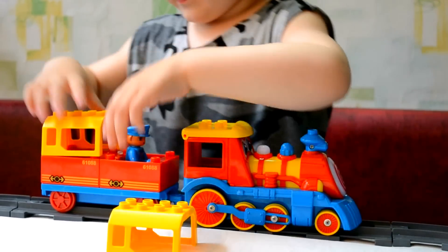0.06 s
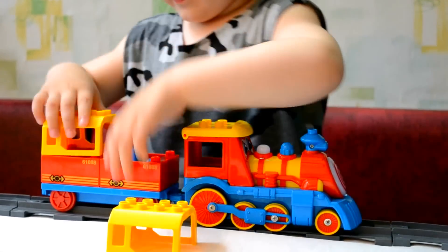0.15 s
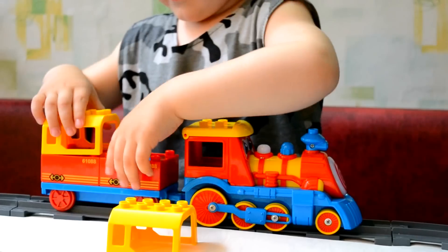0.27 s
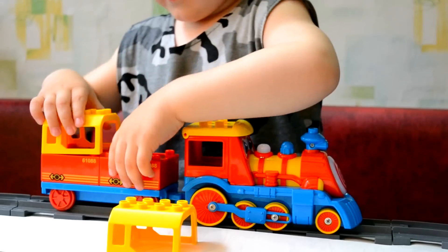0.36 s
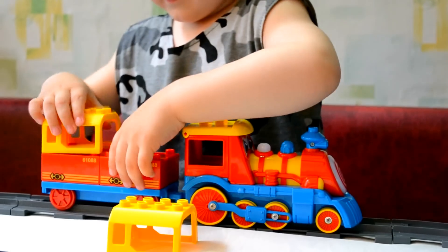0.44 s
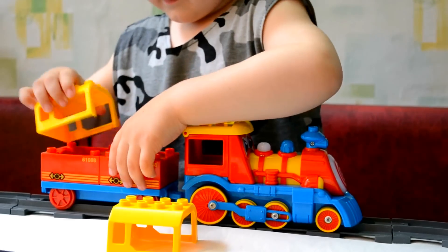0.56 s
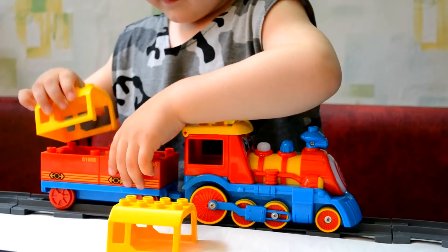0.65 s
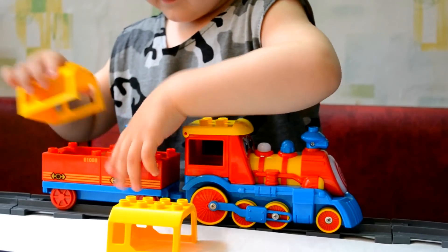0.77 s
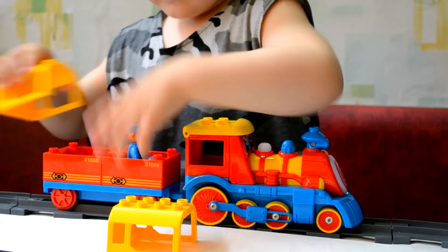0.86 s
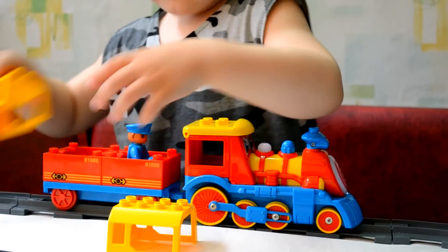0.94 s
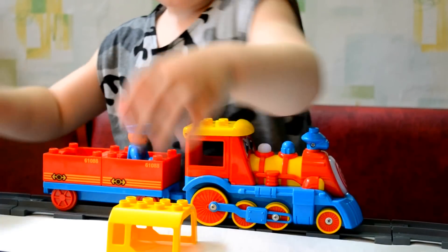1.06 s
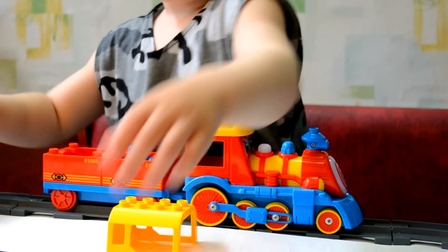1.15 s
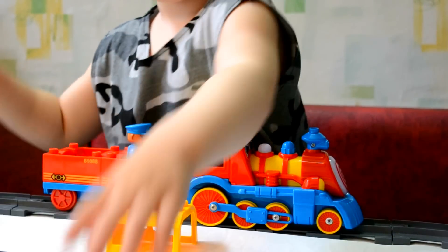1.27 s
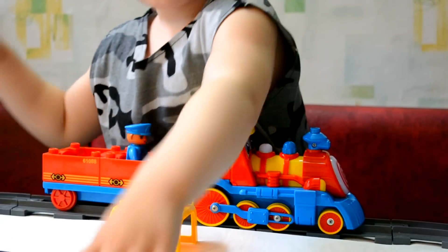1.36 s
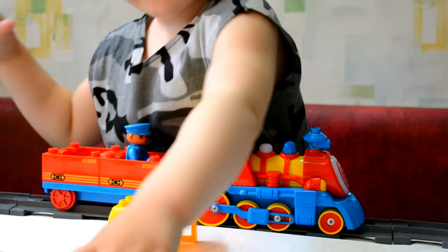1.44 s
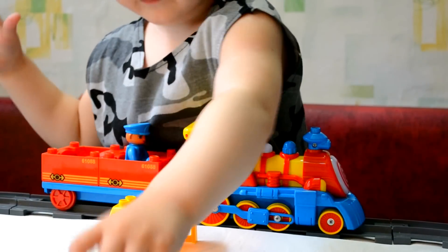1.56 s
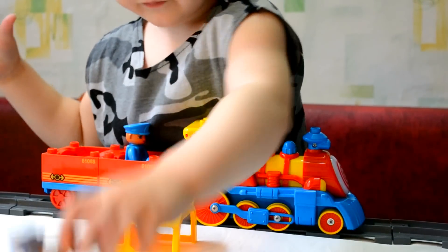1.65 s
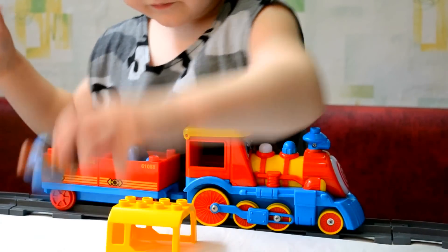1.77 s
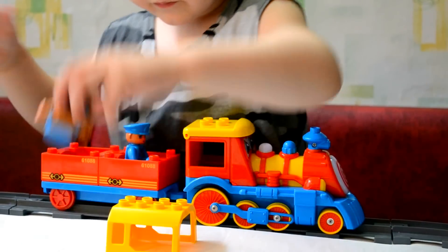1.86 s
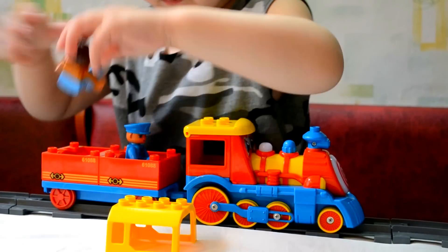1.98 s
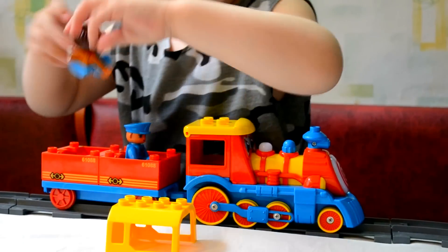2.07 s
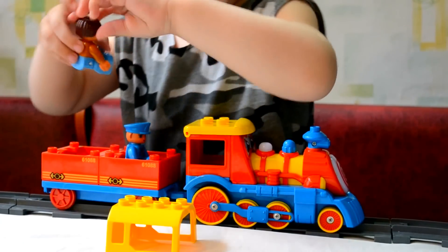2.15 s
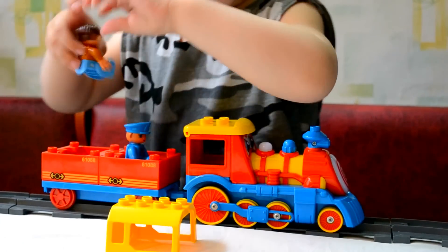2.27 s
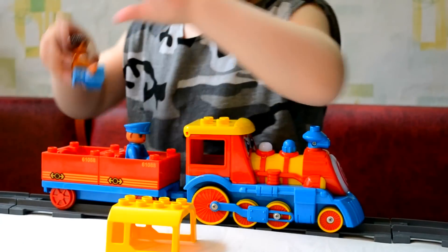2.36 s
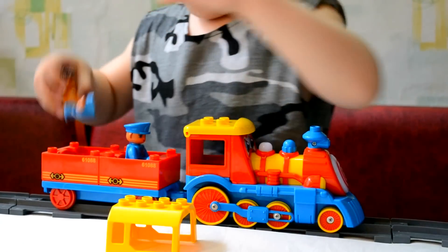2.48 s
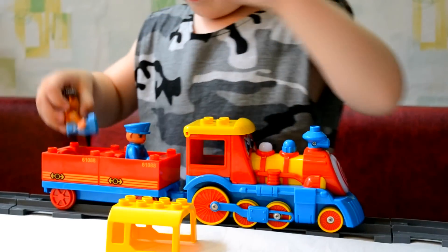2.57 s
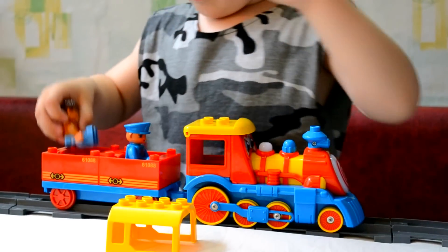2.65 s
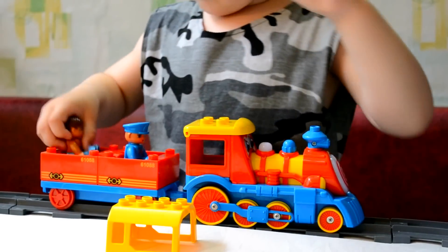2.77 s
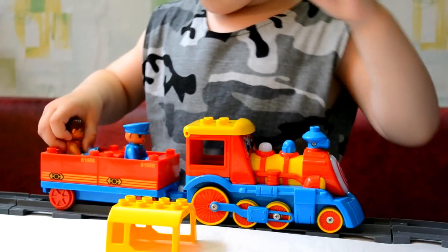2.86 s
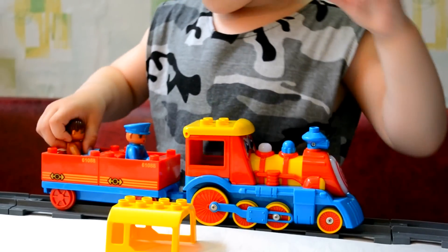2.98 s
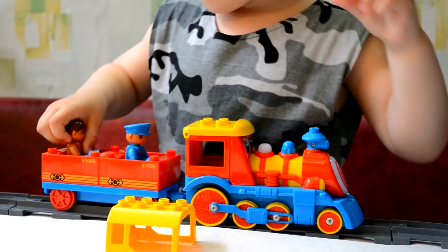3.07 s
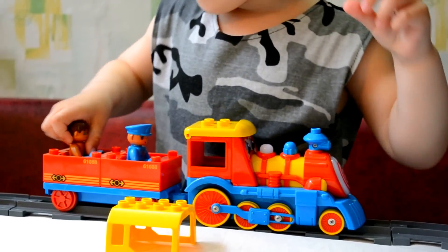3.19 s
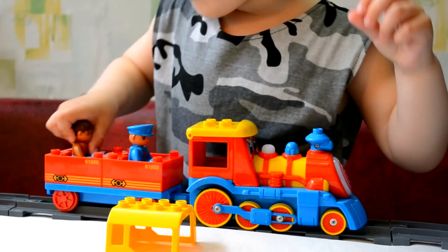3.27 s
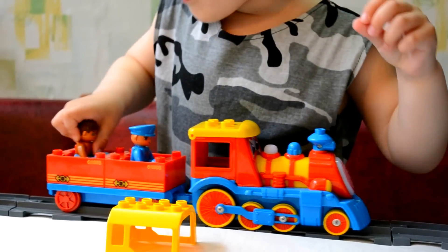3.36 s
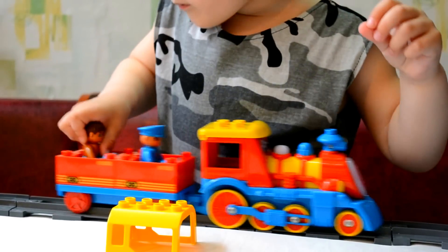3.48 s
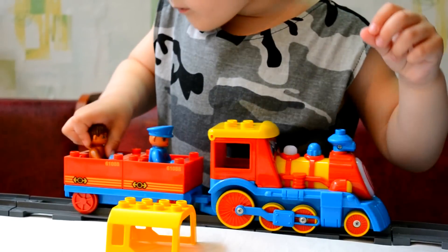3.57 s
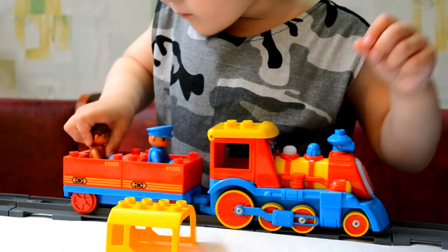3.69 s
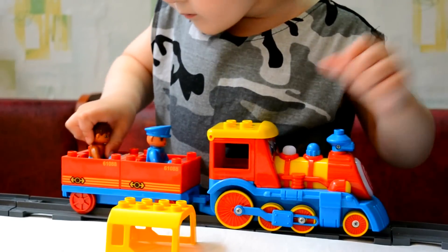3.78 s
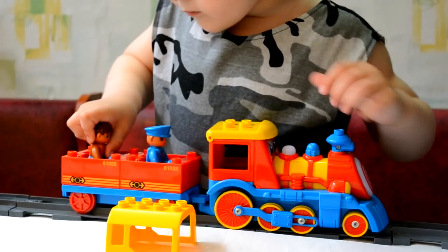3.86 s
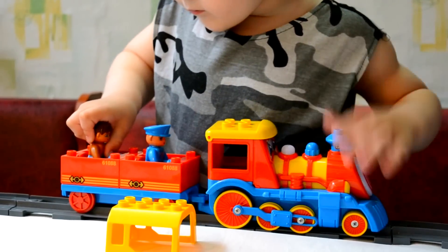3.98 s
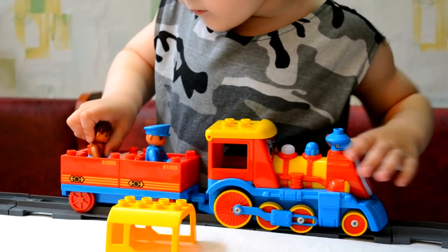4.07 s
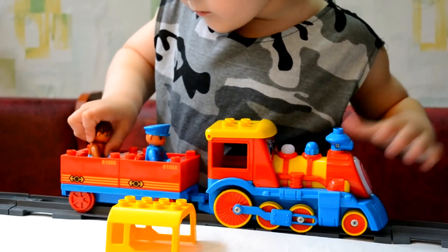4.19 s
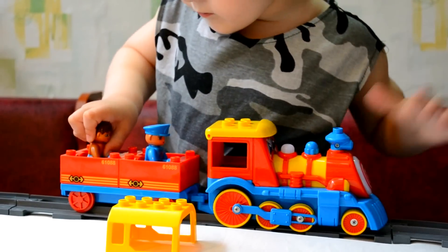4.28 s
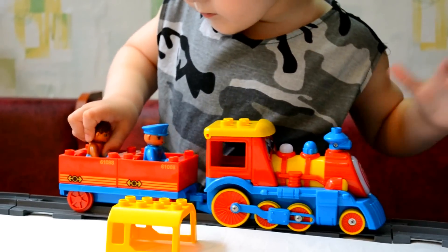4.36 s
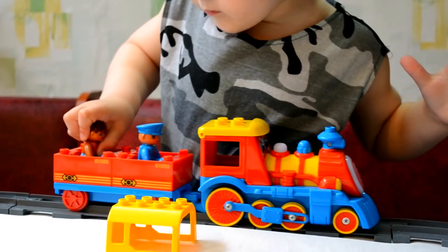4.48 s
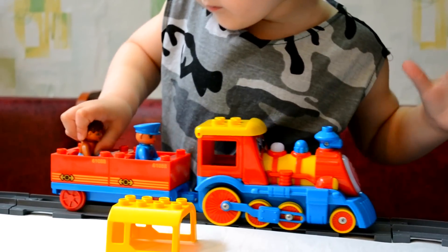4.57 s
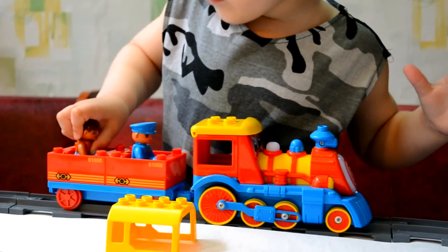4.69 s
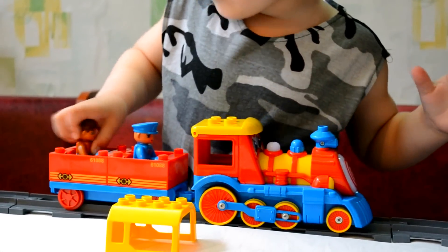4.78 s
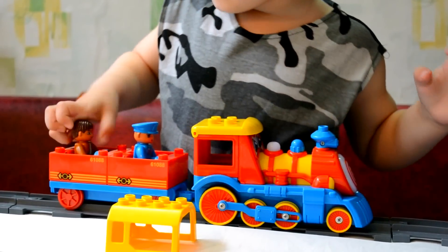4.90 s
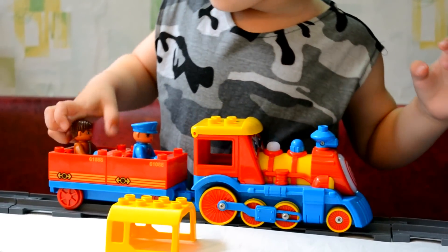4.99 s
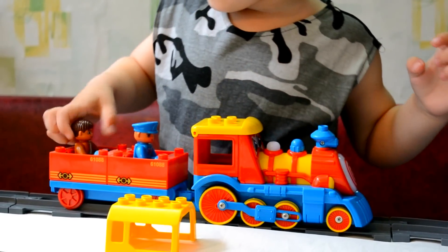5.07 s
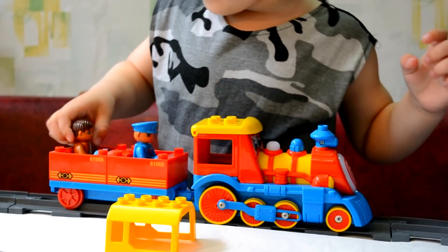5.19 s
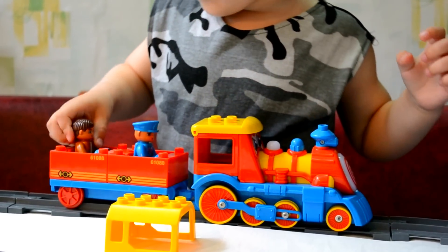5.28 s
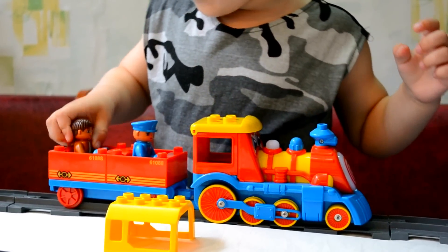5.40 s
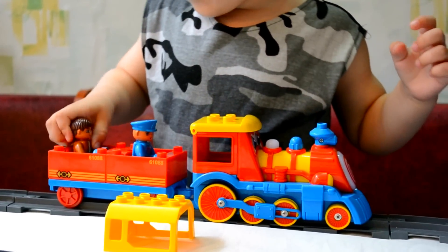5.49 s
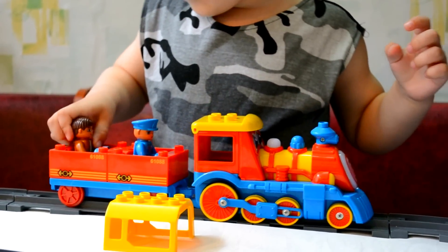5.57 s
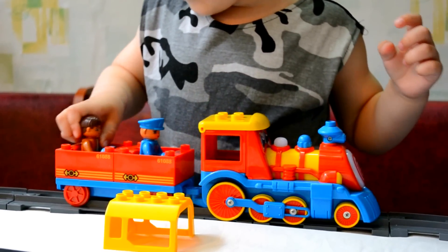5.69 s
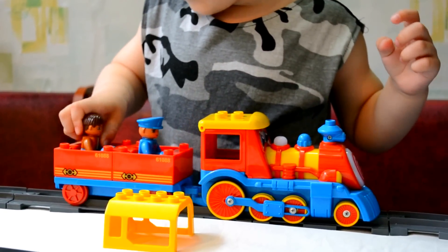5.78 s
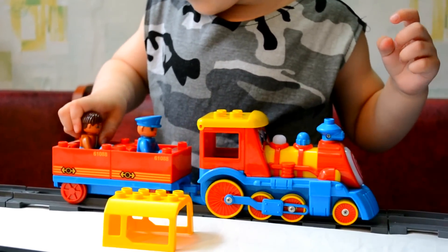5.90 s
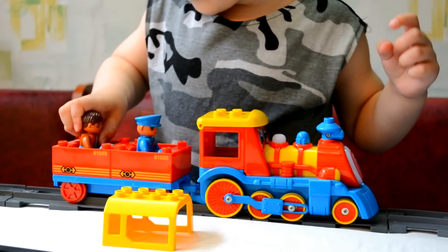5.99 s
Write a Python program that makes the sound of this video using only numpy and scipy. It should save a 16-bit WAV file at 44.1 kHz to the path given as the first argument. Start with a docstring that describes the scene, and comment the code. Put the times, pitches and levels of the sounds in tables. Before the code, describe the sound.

Close-miked toy handling indoors: a few crisp clicks on a hollow plastic wagon, then the loudest event, a bright clattering landing of a hollow plastic part on the table. Quiet finger scuffs and small knocks continue with gaps between them. Late on, tight plastic creaks and snaps sharply onto studs, followed by a short rub and faint taps. Soft room noise, a slight electrical hum and barely audible low throbs lie underneath.

```python
"""Large plastic bricks tap on a hollow toy wagon: each contact is a noise crack plus decaying shell modes.
A loose hollow cab lands hard on the table with its own modes; a figure pressed on the studs snaps dryly.
Stick-slip noise makes the rubs and scuffs. Underneath lie soft sinking throbs, mains hum and room air.
Contacts and friction carry the diffuse decay of a small room; a low-pass ends the band near 11 kHz."""
import sys
import numpy as np
from scipy import signal
from scipy.fft import rfft, irfft, next_fast_len
from scipy.io import wavfile
from scipy.ndimage import map_coordinates

SR = 44100
rng = np.random.default_rng(int(sys.argv[2]) if len(sys.argv) > 2 else 0)


def to_wav(s):
    """Save 16-bit WAV."""
    ch = np.atleast_2d(s).T  # columns
    pcm = np.round(np.clip(ch, -1, 1) * 32767)  # PCM
    wavfile.write(sys.argv[1], SR, pcm.astype(np.int16))


N = 266364  # length in samples


def amp(db):
    """Logarithmic level: decibels become an amplitude ratio."""
    return 10 ** (np.asarray(db) / 20)


def unit(x):
    """Normalisation: scale to rms 1."""
    return x / np.sqrt(np.mean(x ** 2) + 1e-20)


def along(points, hz):
    """Interpolation on a logarithmic frequency axis through (Hz, value) points."""
    f, v = np.transpose(points)
    return np.interp(np.log(hz + 1), np.log(f + 1), v)


def add(track, s, sound):
    """Superposition: mix a sound into the track from time s on."""
    part = track[max(round(s * SR), 0):][:len(sound)]
    part += sound[:len(part)]


def coloured(x, curve):
    """Minimum-phase filtering: the folded cepstrum gives a causal filter of gain curve(Hz) dB."""
    m = 2 * next_fast_len(len(x) // 2 + 1024)
    gain = amp(curve(np.fft.rfftfreq(m, 1 / SR)))
    cepstrum = irfft(np.log(gain + 1e-6))
    cepstrum[1:m // 2] *= 2
    cepstrum[m // 2 + 1:] = 0
    response = np.exp(rfft(cepstrum))
    return irfft(rfft(x, m) * response)[:len(x)]


# Reverberation of the room: pitch_hz [Hz], t60_s [s]
ROOM_DECAY = [(150, 0.2), (800, 0.27), (2200, 0.24), (5500, 0.23), (11000, 0.18)]


def in_room(x, wet_db, build_s=0.0012):
    """Diffuse reverberation: table and walls answer with noise, new each time, that decays band by band."""
    hz = np.fft.rfftfreq(256, 1 / SR)
    t = np.arange(80) * 128 / SR
    noise = rng.standard_normal((len(hz), len(t), 2)) @ [1, 1j]
    decay = amp(-60 * t / along(ROOM_DECAY, hz)[:, None])
    tail = signal.istft(noise * decay)[1]
    tail *= 1 - np.exp(-(np.arange(len(tail)) / SR / build_s) ** 2)
    response = amp(wet_db) * unit(tail) / np.sqrt(len(tail))
    response[0] = 1  # direct sound
    return signal.fftconvolve(x, response)


# Spectrum of the room air: pitch_hz [Hz], density_db [dB per Hz, relative]
AIR_COLOUR = [(12, -63), (20, -23), (185, -8), (341, -6.5), (445, -3), (494, -4), (628, -3), (698, -7),
              (756, -3.5), (1960, -9.5), (2490, -12), (3610, -13), (8000, -29.5), (9130, -24.5),
              (11300, -42.5), (14700, -59), (22000, -120)]
# Mains hum components: pitch_hz [Hz], level_db [dB, before drift]
HUM_TONES = [(100, -92), (399, -75), (500, -66.5), (699.5, -66)]


def background(air_db=-58.0, air_drift_db=2.0, hum_drift_db=2.2, phase_drift_rad=0.5):
    """Stationary noise and tones: room air and an appliance's mains hum, drifting slowly in level."""
    t = np.arange(N) / SR
    drift = lambda: map_coordinates(rng.standard_normal(64), [t * 5])  # five random values per second
    air = unit(coloured(rng.standard_normal(N), lambda f: along(AIR_COLOUR, f)))
    air = amp(air_db + air_drift_db * drift()) * air
    hum = np.zeros(N)
    for hz, db in HUM_TONES:
        level = amp(db + hum_drift_db * drift())
        hum += level * np.sin(2 * np.pi * hz * t + phase_drift_rad * drift())
    return air + hum


# Faint low throbs: start_s [s], level_db [dB, envelope peak]
THROB_TIMES = [(1.019, -60), (2.46, -62), (3.91, -70), (5.379, -61.5)]


def throbs(start_hz=108, sink_per_s=4, swell_s=0.021):
    """Frequency glide: a soft low tone swells and fades while its pitch sinks exponentially."""
    out = np.zeros(N)
    t = np.arange(SR // 4) / SR
    phase = 2 * np.pi * np.cumsum(start_hz * np.exp(-sink_per_s * t)) / SR
    swell = t / swell_s * np.exp(1 - t / swell_s)
    for s, db in THROB_TIMES:
        add(out, s, amp(db) * swell * np.sin(phase))
    return out


def friction(slips_per_s, size_db, hiss):
    """Stick-slip friction: a third of a second of tiny random ticks over a fine hiss."""
    n = SR // 3
    ticks = (rng.random(n) < slips_per_s / SR) * amp(size_db * rng.standard_normal(n))
    return (ticks + hiss) * rng.standard_normal(n)


# Brief drags of fingers and parts: start_s [s], length_s [s], pitch_hz [Hz], level_db [dB]
SCUFF_DRAGS = [(0.56, 0.11, 900, -52), (0.761, 0.016, 1600, -45.5), (1.104, 0.038, 2350, -50),
               (1.281, 0.021, 377, -50.5), (1.497, 0.037, 410, -58.5), (1.637, 0.04, 360, -55.5),
               (1.947, 0.1, 1050, -49), (2.23, 0.044, 9400, -65), (2.401, 0.039, 350, -60),
               (2.704, 0.045, 750, -50), (2.802, 0.039, 2680, -47), (2.998, 0.04, 1410, -52),
               (3.544, 0.064, 176, -58.5), (4.465, 0.031, 1160, -52), (4.517, 0.057, 1090, -55),
               (5.906, 0.022, 2640, -49.5)]
SCUFF_OCTAVES, SCUFF_NARROWING = 0.5, 0.37  # width at 1 kHz [octave-like]; power by which it shrinks with pitch


def scuffs():
    """Resonant filtering of friction: short drags swell and fade in one resonance of the hollow plastic."""
    out = np.zeros(N)
    for s, length, hz, db in SCUFF_DRAGS:
        force = friction(slips_per_s=1000, size_db=5.5, hiss=0.095)
        width = SCUFF_OCTAVES * (hz / 1000) ** -SCUFF_NARROWING
        resonance = lambda f: -20 * np.log10(1 + (np.sinh(np.log((f + 1) / hz)) * 2 / width) ** 2)
        n = round(length * SR)
        drag = coloured(force, resonance)[-n:] * signal.windows.tukey(n, .6)
        add(out, s, in_room(amp(db) * unit(drag), wet_db=-8.0))
    return out


STROKE_DEPTH_DB = 20.5  # a stroke starts and ends this far under its peak


def pressure(s, rise, fall, db):
    """Friction follows load: the hand presses to a peak and lets go, as (s, level dB) corners."""
    return [(s - rise, db - STROKE_DEPTH_DB), (s, db), (s + fall, db - STROKE_DEPTH_DB)]


def stroke(levels, colour, force):
    """Source and filter: friction takes a part's colour and follows the hand's pressure."""
    s, db = np.transpose(levels)
    t = np.arange(len(force)) / SR + s[0]
    envelope = amp(np.interp(t, s, db, right=-120))
    return unit(coloured(force, lambda f: along(colour, f))) * envelope


# Plastic sliding on plastic: peak_s [s, greatest pressure], rise_s [s], fall_s [s], level_db [dB]
RUB_STROKES = [(0.205, 0.032, 0.022, -54), (0.53, 0.006, 0.15, -54), (1.44, 0.056, 0.11, -46.5),
               (3.52, 0.24, 0.092, -60), (3.572, 0.035, 0.023, -43), (5.746, 0.0038, 0.096, -37)]
# Spectrum of the sliding: pitch_hz [Hz], density_db [dB per Hz, relative]
SLIDE_COLOUR = [(120, -28), (200, -11), (839, -8.5), (945, -7.5), (1200, -22), (1370, -3.5), (3710, -1.5),
                (4390, -3), (5110, -10), (10200, -19), (11300, -44), (14700, -44), (22000, -120)]
# Two pushes of the figure onto the studs, before and after the hard snap:
# start_s [s], level_db [dB, before the grind gain]
STUD_PUSHES = [
    [(5.546, -50), (5.554, -37), (5.564, -38), (5.569, -48)],
    [(5.612, -49), (5.646, -40), (5.658, -51), (5.666, -38.5), (5.684, -41), (5.694, -37.5), (5.738, -54)],
]


def rubbing(grind_db=-3):
    """Sliding friction: bricks slide over the wagon, and the figure grinds on its studs."""
    out = np.zeros(N)
    for rub in RUB_STROKES:
        levels = pressure(*rub)
        slide = stroke(levels, SLIDE_COLOUR, friction(slips_per_s=1200, size_db=2.5, hiss=0.14))
        add(out, levels[0][0], in_room(slide, wet_db=-7.5))
    for push in STUD_PUSHES:
        grind = stroke(push, STUD_SHELL, friction(slips_per_s=1600, size_db=3.0, hiss=0.16))
        add(out, push[0][0], in_room(amp(grind_db) * grind, wet_db=-14))
    return out


def strike(db, knock_db, bright_db, modes, crack_colour, crack_t60, ring_db, spot=lambda f: 0,
           knock_hz=950, bright_hz=4800, small_hz=140, scatter_db=0.8, impact_db=-14, grip=0.0049):
    """Modal impact: a short noise crack and the part's decaying modes, struck at new strengths."""
    hz, level, t60 = np.transpose(modes)[:, :, None]
    t = np.arange(round((t60.max() + crack_t60) * SR)) / SR
    attack = slice(SR // 125)  # loudness is the rms of the first 8 ms
    loudness = lambda x: np.sqrt(np.mean(x[attack] ** 2))

    strength = amp(level + scatter_db * rng.standard_normal(hz.shape)) * rng.choice([-1, 1], hz.shape)
    detune = 1 + grip * rng.standard_normal(hz.shape)  # the grip shifts the modes a little
    partials = strength * amp(-60 * t / t60) * np.sin(2 * np.pi * hz * detune * t)
    ring = np.sum(partials, axis=0)

    shell_decay = amp(-60 * t / crack_t60)
    impact_decay = amp(impact_db - 60 * t / 0.00626)
    burst = np.resize(rng.standard_normal(SR // 8), len(t)) * (shell_decay + impact_decay)
    crack = coloured(burst, lambda f: along(crack_colour, f))

    # a flat blow knocks low, an edge clicks bright
    knock = lambda f: knock_db / (1 + (f / knock_hz) ** 4)
    bright = lambda f: bright_db * (1 - 1 / (1 + (f / bright_hz) ** 4))
    radiation = lambda f: -10 * np.log10(1 + (small_hz / (f + 10)) ** 4)  # small parts radiate no deep bass
    hit = crack / loudness(crack) + amp(ring_db) * ring / loudness(ring)
    hit = np.pad(hit, (0, SR // 50))
    hit = coloured(hit, lambda f: knock(f) + bright(f) + radiation(f) + spot(f))
    return amp(db) * hit / loudness(hit)


SLIP_GAP_S, SLIP_DB = 0.014, -3  # mean spacing; level against the push table


def slips():
    """Stick-slip release: small unevenly timed slips, stronger with the push, as (s, level dB)."""
    rows = []
    for push in STUD_PUSHES:
        s, db = np.transpose(push)
        times = np.arange(s[0], s[-1] - SLIP_GAP_S / 2, SLIP_GAP_S)
        times = times + SLIP_GAP_S * rng.random(len(times))
        rows += zip(times, np.interp(times, s, db) + SLIP_DB)
    return rows


# Tight plastic slipping and snapping: start_s [s], level_db [dB]
STUD_SNAPS = [(5.5259, -39.5), (5.5526, -42), (5.5637, -42), (5.579, -21), (5.6357, -39.5), (5.6652, -38),
              (5.7442, -39)]
# Ringing modes of the studs: pitch_hz [Hz], level_db [dB, relative], t60_s [s]
STUD_RING = [(1890, -8.5, 0.026), (2330, -29, 0.0091), (2575, -3.5, 0.018), (2750, -5, 0.021),
             (3330, -2, 0.0093), (5730, -10, 0.0054), (9900, -23.5, 0.0074)]
# Crack of the studs' many short-lived modes: pitch_hz [Hz], density_db [dB per Hz, relative]
STUD_SHELL = [(30, -47), (100, -19), (250, -7), (1200, -6), (2600, 1), (4000, -2.5), (6000, -17),
              (8300, -25), (10000, -29), (11500, -39)]
KNOCK_EVEN_DB, KNOCK_SLOPE = -33, 1.3  # softer snaps knock more, harder ones less [dB per dB]


def studs(bright_db=-2, most_knock_db=13):
    """Heavily damped modes: tightly held plastic slips in dry snaps, the soft ones duller."""
    out = np.zeros(N)
    for s, db in STUD_SNAPS + slips():
        knock_db = min(KNOCK_SLOPE * (KNOCK_EVEN_DB - db), most_knock_db)
        snap = strike(db, knock_db, bright_db, STUD_RING, STUD_SHELL, crack_t60=0.0078, ring_db=9.5)
        add(out, s, in_room(snap, wet_db=-21))
    return out


# The cab lands on one edge, then flat: start_s [s], level_db [dB], knock_db [dB], bright_db [dB]
CAB_LANDING = [(1.1454, -16.5, -2, 4.5), (1.1494, -22, -1, -12.5), (1.166, -14, -1.5, -20.5),
               (1.1724, -21.5, -7, -12)]
# Ringing modes of the cab: pitch_hz [Hz], level_db [dB, relative], t60_s [s]
CAB_RING = [(178, -37, .1), (370, -16, 0.16), (683, -5, 0.19), (797, -6, 0.098), (880, -4.5, 0.073),
            (946, -3, 0.078), (1004, -4, 0.063), (1115, -18, 0.14), (1310, -13, .08), (1508, -7, 0.12),
            (1560, 0, 0.14), (1940, -10, 0.17), (2130, -8, 0.09), (2380, -10, .1), (2330, -9, .08),
            (2658, 9, 0.062), (2615, 1, 0.11), (2760, -8.5, 0.14), (3570, -8, 0.106), (3670, 2, 0.14),
            (4800, -23, .07), (7070, -1, .04), (8930, 2, 0.037)]
# Crack of the cab's many short-lived shell modes: pitch_hz [Hz], density_db [dB per Hz, relative]
CAB_SHELL = [(30, -57.5), (100, -38), (200, -52), (350, -13), (520, -10.5), (950, -1), (1400, -1.5),
             (1900, -3), (2600, -3.5), (4000, -9.5), (5300, -8), (7000, -19), (7900, -22.5), (9000, -10.5),
             (10200, -19.5), (11500, -37)]


def cab():
    """Free vibration of a hollow shell: the loose cab clacks down and rings with little damping."""
    out = np.zeros(N)
    for s, *blow in CAB_LANDING:
        clack = strike(*blow, CAB_RING, CAB_SHELL, crack_t60=0.029, ring_db=-3.0, impact_db=-2.5, grip=0.0018)
        add(out, s, in_room(clack, wet_db=-6.0))
    return out


# Clear contacts on the wagon: start_s [s], level_db [dB], spot [name]
WAGON_TAPS = [(0.2204, -31.5, "rim"), (0.2943, -39.5, "rim"), (0.464, -36, "corner"),
              (0.4805, -28, "corner"), (0.492, -30.5, "corner"), (0.5296, -32.5, "corner"),
              (0.6371, -46.5, "floor"), (0.6783, -48.5, "flat"), (0.7734, -33.5, "wall"),
              (0.882, -51, "wall"), (1.3633, -47.5, "corner"), (1.4282, -43.5, "corner"),
              (1.4412, -41, "edge"), (1.4866, -48, "corner"), (1.6379, -46.5, "wall"), (1.875, -43, "stud"),
              (1.9586, -45.5, "flat"), (2.703, -37.5, "floor"), (2.7142, -39, "stud"),
              (2.7454, -39.5, "wall"), (2.792, -37.5, "floor"), (2.8912, -32.5, "wall"),
              (3.017, -54, "edge"), (3.463, -48, "edge"), (3.548, -43.5, "floor"), (3.5682, -38, "wall"),
              (3.7632, -32.5, "wall"), (3.957, -50, "flat"), (4.0385, -52, "floor"), (4.2193, -50, "edge"),
              (4.5044, -42, "edge"), (4.677, -50.5, "stud"), (4.773, -30.5, "edge"),
              (4.7958, -36.5, "wall"), (4.9783, -46, "stud"), (5.062, -35, "wall"), (5.2602, -50, "wall"),
              (5.82, -42, "wall"), (5.9621, -49, "wall")]
# Where and how the wagon is touched, by spot name: pitch_hz [Hz, local resonance], knock_db [dB], bright_db [dB]
WAGON_SPOTS = {"rim": (1880, -7, 0.92), "corner": (2140, 0, 9.5), "wall": (1453, -9.5, -3.5),
               "edge": (1420, -7, 9.1), "floor": (730, 9.5, 7.8), "flat": (920, 7.9, -23),
               "stud": (2820, -5, -0.89)}
FIDGET_START_S, FIDGET_END_S = 2.8, 5.4  # the held figure ticks faintly in this span
FIDGET_DB, FIDGET_SPREAD_DB = -50.5, 1
GRAZE_S, GRAZE_DB, FIRM_DB = 0.008, -14, -36.8  # lead; level against the tap; taps above this graze first


def contacts(count=6):
    """Contact sequence: taps, grazes just ahead of the firm ones, and faint chance ticks of the figure."""
    grazes = [(s - GRAZE_S, db + GRAZE_DB, spot) for s, db, spot in WAGON_TAPS if db > FIRM_DB]
    ticks = []
    for k in range(count):
        s = FIDGET_START_S + (FIDGET_END_S - FIDGET_START_S) * (k + rng.random()) / count
        ticks.append((s, rng.normal(FIDGET_DB, FIDGET_SPREAD_DB), rng.choice(list(WAGON_SPOTS))))
    return WAGON_TAPS + grazes + ticks


# Ringing modes of the wagon: pitch_hz [Hz], level_db [dB, relative], t60_s [s]
WAGON_RING = [(647, 2, 0.044), (749, -5, 0.13), (997, 4, 0.061), (1355, 9, 0.028), (1432, 9, 0.029),
              (1491, -3, 0.099), (1615, 1, 0.087), (1850, -6, 0.043), (2002, 4, 0.055), (2507, -1, 0.066),
              (2670, 3, 0.026), (2942, 6.5, 0.042), (3430, -18, 0.047), (3800, -2.5, 0.04),
              (4373, -4, 0.069), (4620, -13, .03), (8700, -28, .03)]
# Crack of the wagon's many short-lived shell modes: pitch_hz [Hz], density_db [dB per Hz, relative]
WAGON_SHELL = [(30, -37), (100, -21), (200, -35), (600, -5.5), (1000, -2), (1450, 0), (2600, 1),
               (4000, -8.5), (6000, -13.5), (7500, -18.5), (8700, -17), (10200, -23), (11500, -44.5)]


def wagon(spot_db=7, spot_octaves=0.17):
    """Position-dependent excitation: taps on the hollow wagon favour the resonance of the spot they hit."""
    out = np.zeros(N)
    for s, db, where in contacts():
        hz, knock_db, bright_db = WAGON_SPOTS[where]
        spot = lambda f: spot_db * np.exp(-(np.log2((f + 1) / hz) / spot_octaves) ** 2)
        tap = strike(db, knock_db, bright_db, WAGON_RING, WAGON_SHELL, crack_t60=0.029, ring_db=-2.5, spot=spot)
        add(out, s, in_room(tap, wet_db=-3.5))
    return out


def scene():
    """Linear superposition: all sounds sum at one microphone."""
    mix = background() + throbs() + scuffs() + rubbing() + studs() + cab() + wagon()
    return mix[None]


def record(dry):
    """Band limitation: a steep elliptic low-pass removes what lies above its 11140 Hz edge."""
    low_pass = signal.ellip(10, .1, 70, 11140, fs=SR, output="sos")  # 0.1 dB ripple, 70 dB stopband
    return signal.sosfilt(low_pass, dry)


dry = scene()
out = record(dry)
to_wav(out)
```